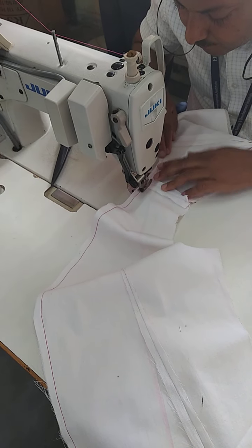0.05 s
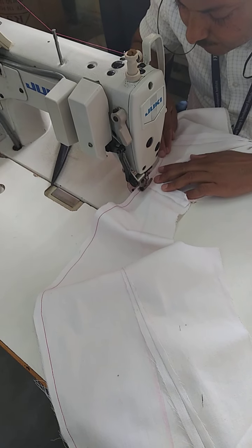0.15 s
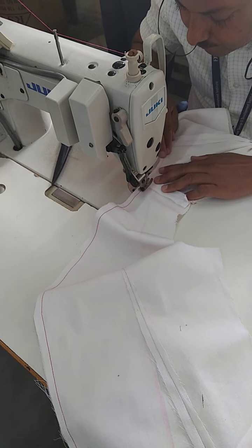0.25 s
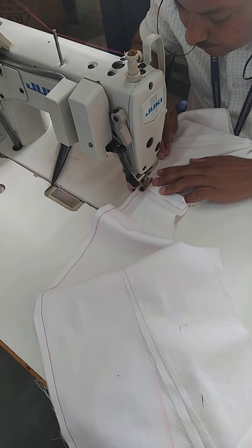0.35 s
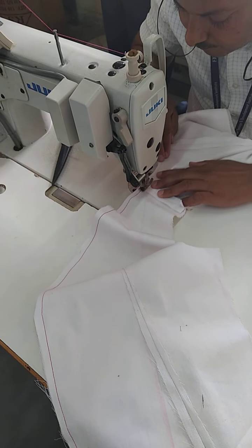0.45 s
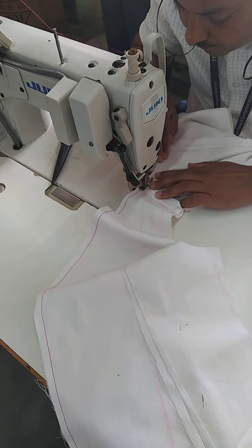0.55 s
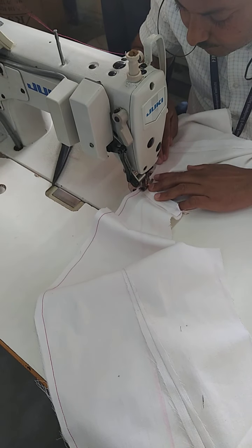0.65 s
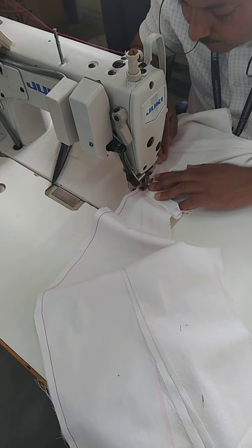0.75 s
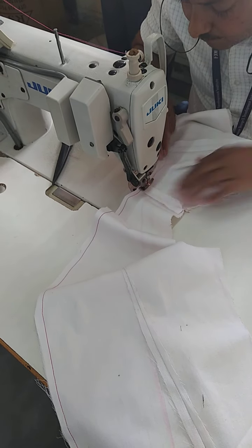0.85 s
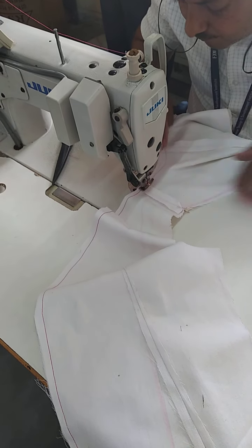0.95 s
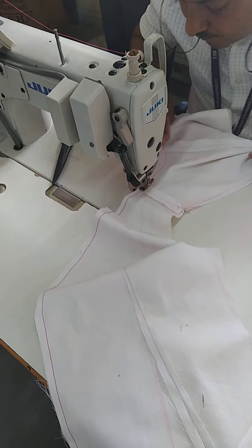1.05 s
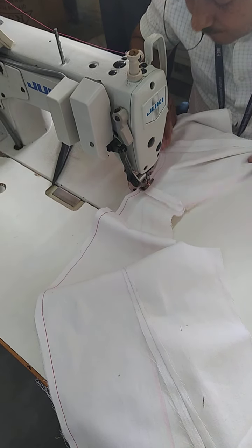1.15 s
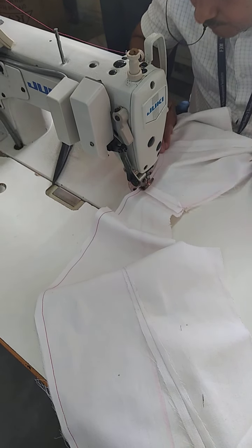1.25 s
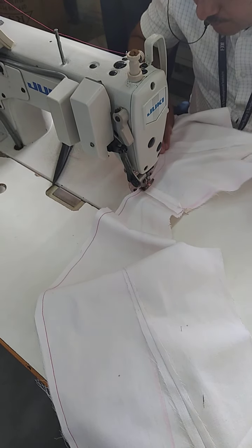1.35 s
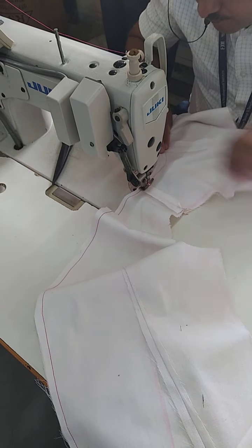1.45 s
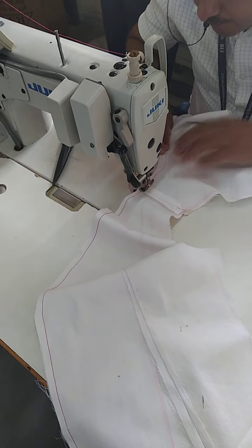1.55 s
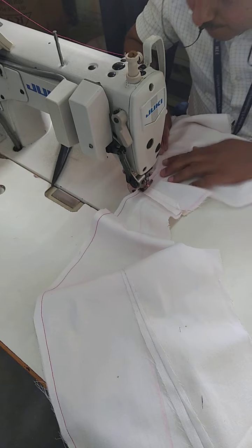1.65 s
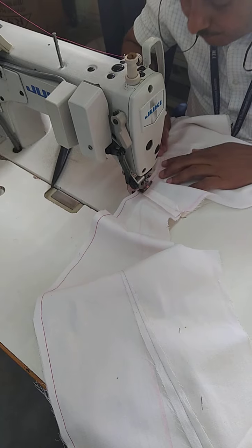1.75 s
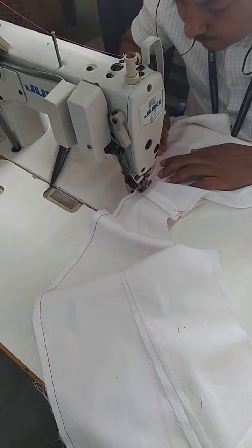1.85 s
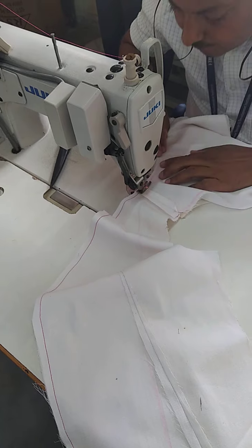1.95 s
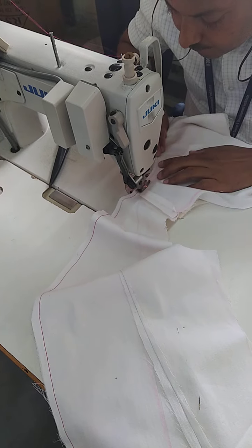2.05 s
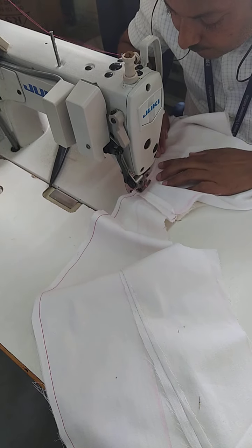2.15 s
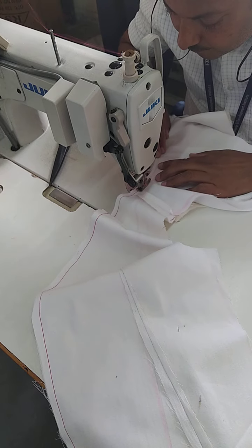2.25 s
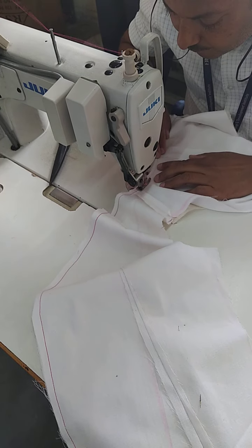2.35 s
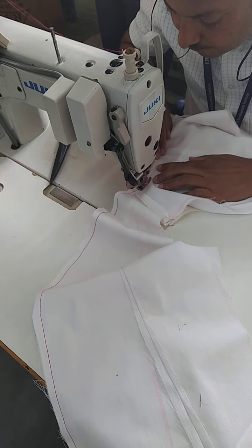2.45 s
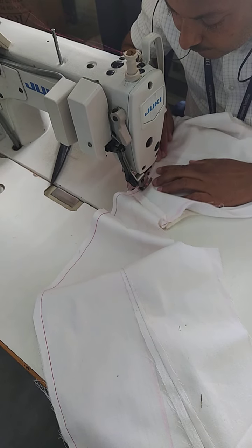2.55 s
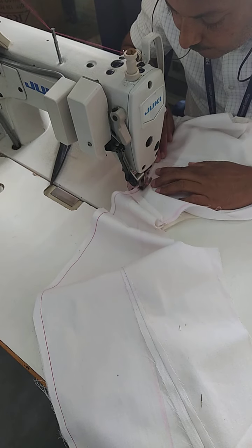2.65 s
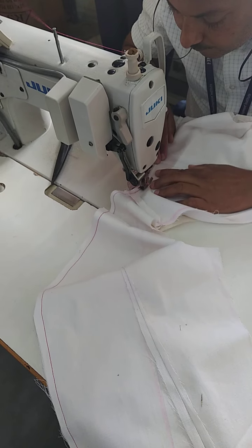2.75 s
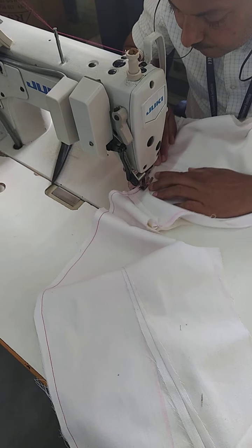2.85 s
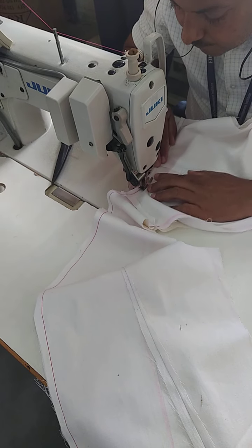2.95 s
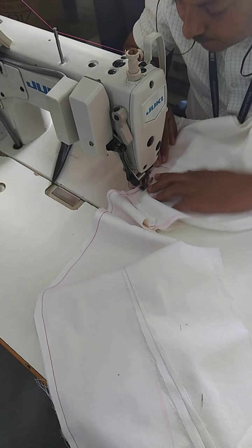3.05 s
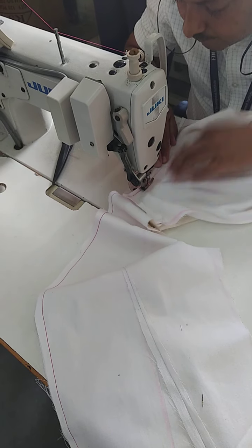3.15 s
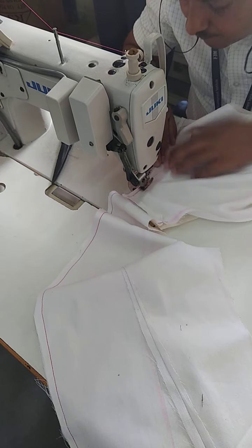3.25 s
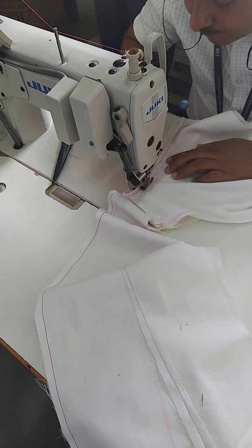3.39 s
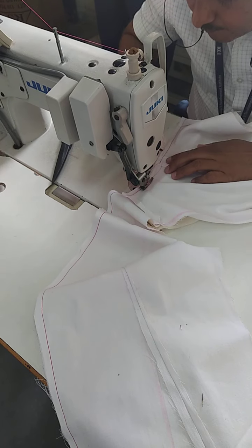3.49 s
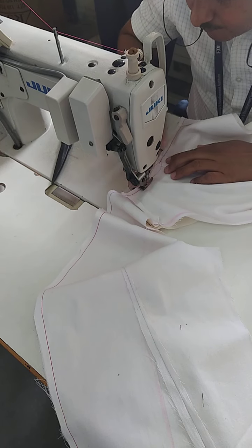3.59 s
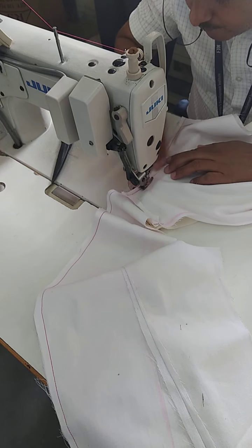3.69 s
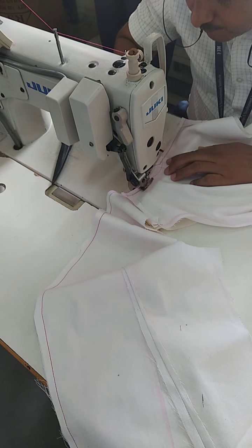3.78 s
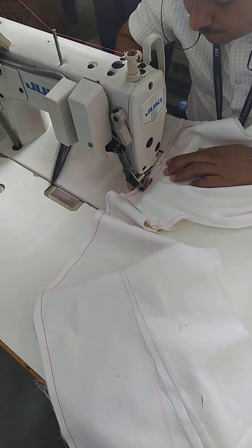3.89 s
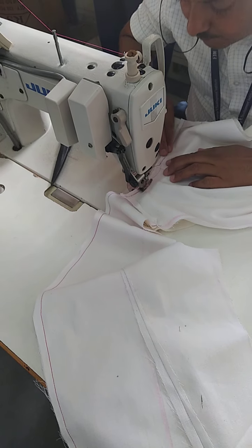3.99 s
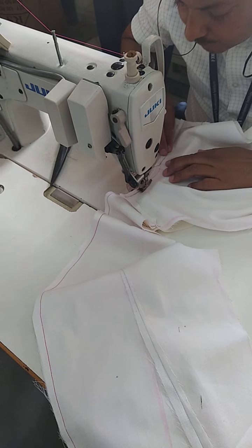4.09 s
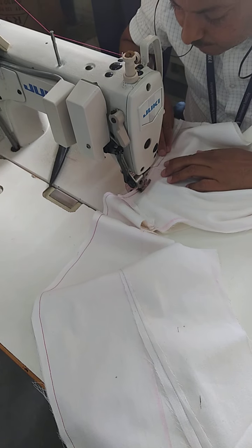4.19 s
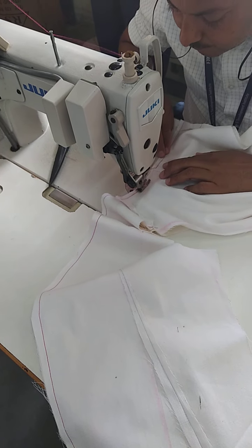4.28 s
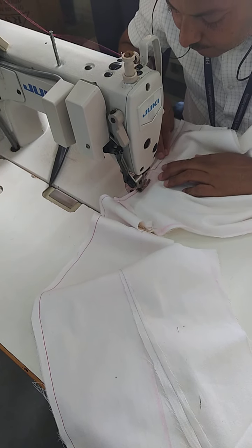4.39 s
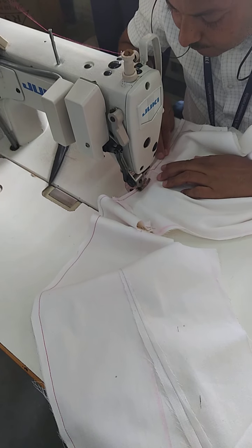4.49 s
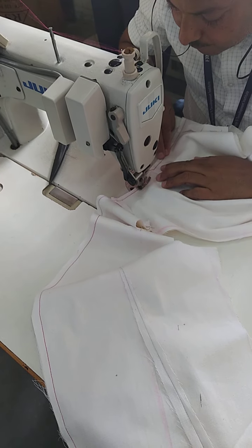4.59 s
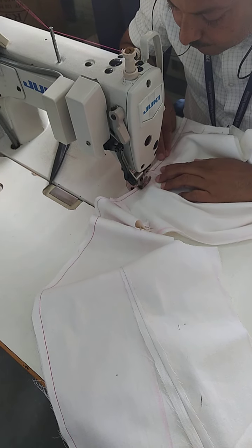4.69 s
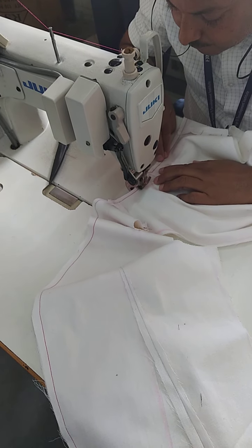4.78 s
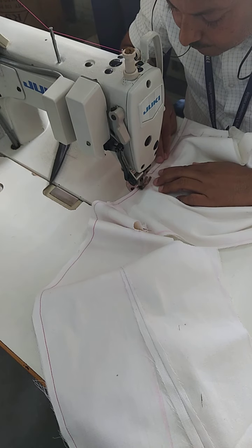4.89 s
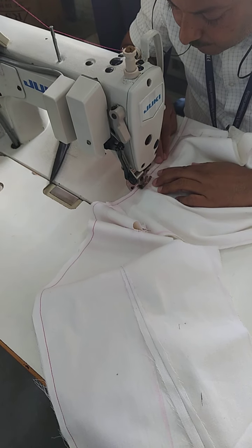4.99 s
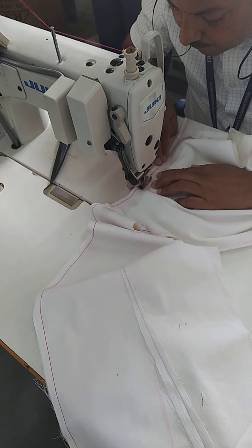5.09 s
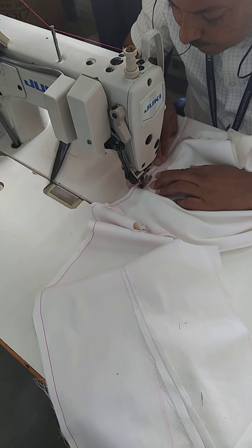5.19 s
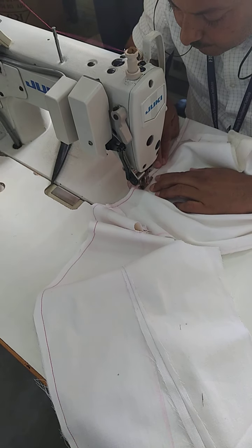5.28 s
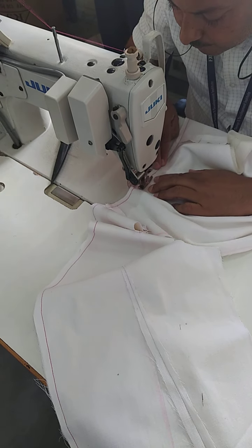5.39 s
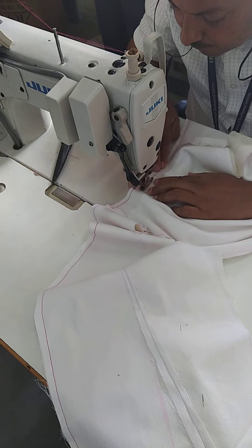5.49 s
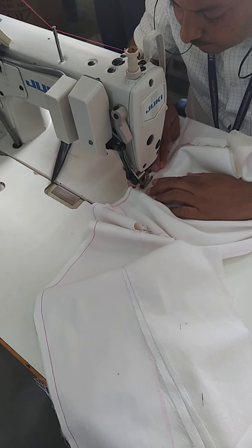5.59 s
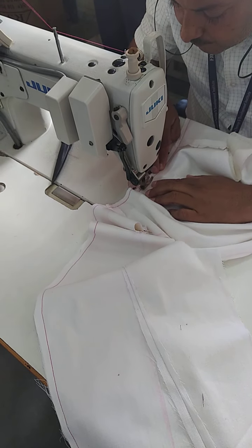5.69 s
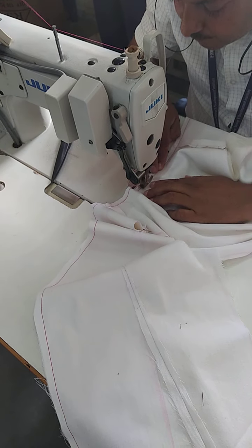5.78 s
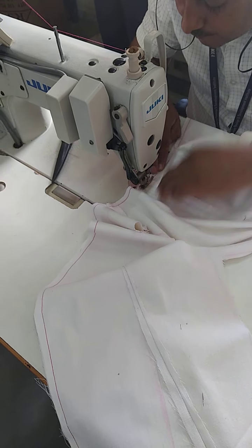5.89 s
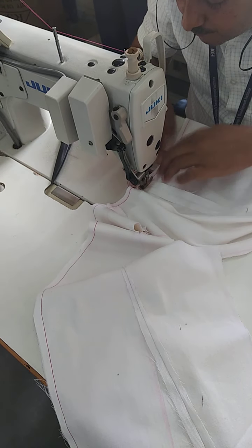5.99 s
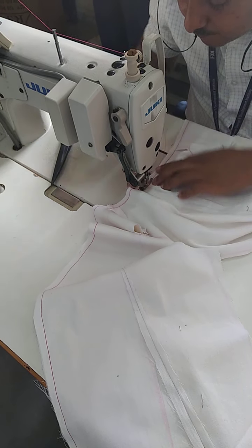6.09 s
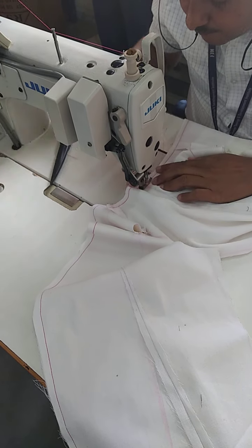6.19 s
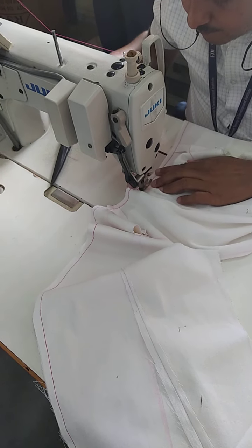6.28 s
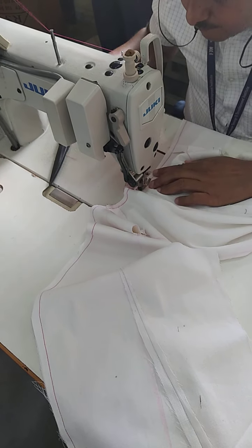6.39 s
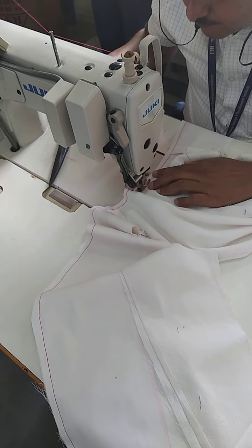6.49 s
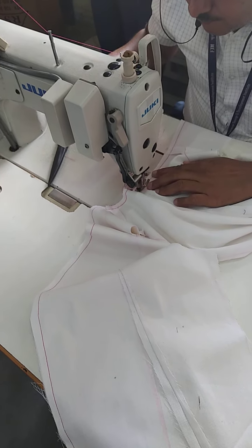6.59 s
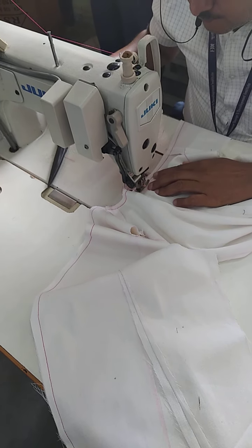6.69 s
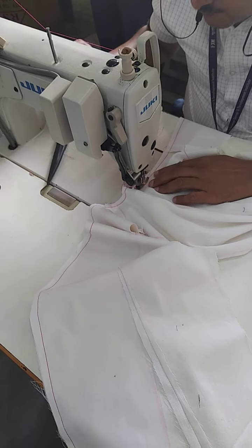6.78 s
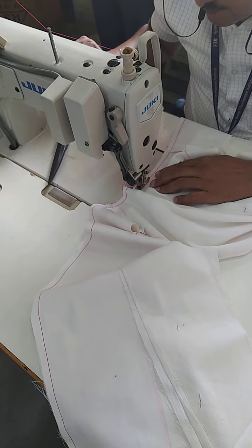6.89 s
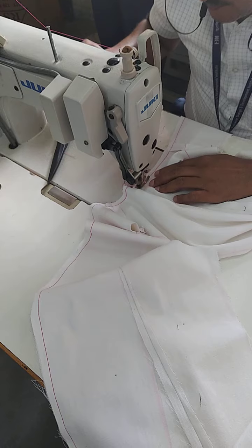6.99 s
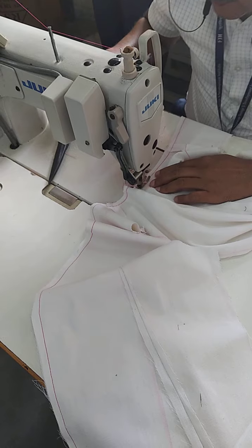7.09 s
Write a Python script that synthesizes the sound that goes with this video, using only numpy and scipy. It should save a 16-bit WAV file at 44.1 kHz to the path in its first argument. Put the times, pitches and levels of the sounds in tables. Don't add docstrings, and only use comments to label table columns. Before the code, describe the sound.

A close industrial sewing machine in a workshop, recorded in stereo with very low background: distant machines and fans as a dull, muffled floor. At 0.25 s a jolt and strong gear whir burst out, peaking near 0.33 and fading by 0.8, with a brake knock at 0.63. Quiet follows, with faint high cloth rustle near 1.1-1.4. At 1.95 a second, softer run starts, purring at about 17 turns per second with crisp needle ticks around 2.1-2.35, stopping with a knock at 2.96. Near silence until 4.16, when the longest run leaps in, bright and rattling, with sharp needle strikes to 4.45, then steady throbbing whir. Around 5.2-5.34 cloth scrapes and squeaks. It stops at 5.82 with a knock. A short strong burst runs 6.22-6.58, ending in a knock. Hard metallic trimmer clacks with brief whirs land at 6.88, 7.03 and 7.10.

```python
import sys
import numpy as np
from scipy import signal
from scipy.fft import rfft, irfft, next_fast_len
from scipy.io import wavfile
from scipy.ndimage import uniform_filter1d, map_coordinates

SR = 44100
rng = np.random.default_rng(int(sys.argv[2]) if len(sys.argv) > 2 else 0)


def ratio_of_db(decibels):
    return 10 ** (np.asarray(decibels, float) / 20)


def generate_wav(signal):
    frames = np.transpose(np.atleast_2d(signal))
    scaled = np.clip(frames, -1, 1) * 32767
    pcm = np.round(scaled).astype(np.int16)
    wavfile.write(sys.argv[1], SR, pcm)


N = 314874

# (time [s], level [dB])
LOAD_RUNS = [
    [(0.245, -76), (0.28, -32.5), (0.33, -25), (0.41, -31), (0.5, -36.5), (0.58, -46.5), (0.67, -53.5),
     (0.8, -60.5), (0.9, -76)],
    [(1.945, -91), (1.98, -38.5), (2.0, -34), (2.07, -41.5), (2.4, -45.5), (2.88, -47), (3.0, -58.5),
     (3.08, -60.5), (3.2, -75)],
    [(4.14, -68.5), (4.18, -33.5), (4.22, -28.5), (4.32, -34.5), (4.45, -39.5), (4.5, -46), (5.74, -46.5),
     (5.87, -58), (6.0, -69)],
    [(6.21, -64), (6.25, -32), (6.28, -29.5), (6.35, -29.5), (6.4, -38), (6.47, -44), (6.6, -51.5),
     (6.7, -57.5), (6.8, -68)],
    [(6.9, -24.5), (6.93, -33), (6.995, -35), (7.012, -49), (7.05, -37), (7.07, -45), (7.09, -54),
     (7.12, -26.5), (7.14, -34.5)],
]
# (start [s], opening speed [turns/s], later speed [turns/s], stop [s])
SHAFT_RUNS = [
    (.272, 23, 18, .64),
    (1.97, 15.2, 16.8, 2.96),
    (4.16, 20.5, 15.86, 5.82),
    (6.228, 21.2, 20, 6.58),
]
CRUISE_DB = -47


def unit(x):
    return x / np.sqrt(np.mean(x ** 2) + 1e-20)


def noise():
    return rng.standard_normal((2, N))


def gains(spans):
    rows = []
    for span in spans:
        rows += [(span[0][0] - .04, -110), *span, (span[-1][0] + .05, -110)]
    return np.interp(np.arange(N) / SR, *np.transpose(rows))


def swell(s, db, rise, fall, hold=0):
    t = np.arange(N) / SR - s
    return ratio_of_db(db + rise * np.minimum(t, 0) - fall * np.maximum(t - hold, 0))


def filtered(x, response):
    m = next_fast_len(N + 8192)
    return irfft(rfft(x, m) * response(np.fft.rfftfreq(m, 1 / SR)), m)[..., :N]


def shape(points):
    f, v = np.transpose(points)
    return lambda hz: ratio_of_db(np.interp(np.log(hz + 1), np.log(f), v))


def peak(hz, width):
    return lambda f: 1j * f * width / (hz * hz - f * f + 1j * f * width)


def peaks(rows):
    return lambda f: sum((-1) ** k * ratio_of_db(db) * peak(hz, w)(f) for k, (hz, w, db) in enumerate(rows))


def narrow(x, hz, width):
    return filtered(x, lambda f: peak(hz, width)(f) * peak(hz, 2 * width)(f))


def patchy(depth_db):
    z = signal.stft(noise(), nperseg=512)[2]
    field = uniform_filter1d(rng.standard_normal(z.shape[1:]), 6, 0)
    field = uniform_filter1d(field, 6, 1)
    return signal.istft(z * ratio_of_db(depth_db * unit(field)), nperseg=512)[1][:, :N]


def shaft():
    opening_turns = 4
    knots, made = [], 0
    for start, opening, later, stop in SHAFT_RUNS:
        settle = start + opening_turns / opening
        end = made + opening_turns + (stop - settle) * later
        knots += [(start, made), (settle, made + opening_turns), (stop, end)]
        made = np.ceil(end)
    return np.interp(np.arange(N) / SR, *np.transpose(knots))


def running():
    # (frequency [Hz], width [Hz], level [dB])
    arm_modes = [(1276, 13, 1), (1965, 73, 1.5), (2412, 72, 1.5), (2850, 70, 10), (3130, 37, 7),
                 (5300, 120, -2.5), (5700, 50, -28), (7550, 720, 1)]
    # (frequency [Hz], width [Hz], level [dB])
    table_modes = [(103, 94, -6), (195.7, 109, 2.5), (311.3, 65, 2), (619, 150, 3), (836, 80, -2)]
    # (frequency [Hz], level [dB])
    gear_tone = [(530, -18.5), (900, -1), (1150, -0.5), (1960, -4.5), (2880, -10), (3530, 4), (5310, -1.5),
                 (7560, -7), (8300, -33.5), (10800, -54.5), (18300, -120)]
    # (frequency [Hz], level [dB])
    thread_tone = [(4710, -43.5), (8000, 6.5), (8970, 1), (10500, 3.5), (12700, -4), (15100, -1),
                   (15900, -22)]

    load_db = gains(LOAD_RUNS) - CRUISE_DB

    def follow(db, grows, fades):
        return ratio_of_db(db + np.where(load_db > 0, grows, fades) * load_db)

    turns = shaft()
    part = turns % 1

    def throb(once_db, twice_db):
        return ratio_of_db(once_db * np.cos(2 * np.pi * part) + twice_db * np.cos(4 * np.pi * part))

    def head(f):
        deaf = 1 - .65 * np.abs(peak(3720, 350)(f))
        return shape(gear_tone)(f) * (.62 + np.abs(peaks(arm_modes)(f))) * deaf

    click = ratio_of_db(8 + 3 * rng.standard_normal(64))[turns.astype(int)] * np.exp(-part / 0.06)
    gears = filtered(patchy(depth_db=.9), head) * throb(0.5, 0.79) * (1 + 0.11 * click)
    table = filtered(patchy(depth_db=4.0), lambda f: peaks(table_modes)(f) * peak(350, 1200)(f))
    table = table * throb(0.27, 0.31)
    thread = filtered(noise() * (1 + click), shape(thread_tone))

    whir = ratio_of_db(-5.5) * ratio_of_db(CRUISE_DB + load_db) * unit(gears)
    rumble = ratio_of_db(-4.5) * follow(-54, grows=0.83, fades=.55) * unit(table)
    hiss = ratio_of_db(-1.5) * follow(-65, grows=1.166, fades=2.1) * unit(thread)
    return whir + rumble + hiss


def needle():
    # (time [s], peak level [dB], pitch [Hz], edge level [dB])
    strikes = [(0.229, -58, 6900, -5), (0.246, -43, 6200, -18), (0.6965, -42, 6530, -25),
               (0.727, -38, 5430, -24), (0.785, -51, 5500, -29), (1.9225, -53, 5150, -14),
               (1.9354, -51, 4930, -11.5), (2.1156, -26, 5800, -35), (2.2064, -30.5, 5300, -20),
               (2.2855, -17.5, 5470, -34), (2.2947, -23.5, 6600, -24), (2.3454, -33, 5170, -12),
               (3.0499, -49, 5750, 30.5), (4.2, -24, 5740, -18), (4.246, -9.5, 6100, -24.5),
               (4.2935, -7, 6400, -19.5), (4.3427, -10, 5400, -30.5), (4.3537, -22, 5270, -16),
               (4.4021, -11, 5890, -16), (4.4154, -24, 5880, -21), (4.5365, -18.5, 6380, -29),
               (4.6039, -22.5, 6100, -28), (4.667, -34, 6360, -23.5), (4.9802, -33, 5700, -22.5),
               (5.0417, -32, 5300, -30), (6.1876, -52.5, 4430, -30)]
    plate_db, sharp = -6, .75
    out = np.zeros((3, 2, N + 2048))
    t = np.arange(2048) / SR
    for s, db, hz, edge_db in strikes:
        ping = np.sin(2 * np.pi * hz * t) * np.exp(-((t - .0012) / .00028) ** 2)
        onset = 1 - np.exp(-(t / .0012) ** 2)
        rattle = rng.standard_normal((2, len(t))) * ratio_of_db(-60 * t / 0.02) * onset
        tip = sharp * ping + 1.47 * rattle
        plate = ratio_of_db(plate_db) * rattle
        edge = ratio_of_db(edge_db - 15.5) * rattle * ratio_of_db(-60 * t / 0.0083)
        strike = ratio_of_db(db + 1.0) * np.array([tip, plate, edge]) * [[1], [.7]]
        out[..., round(s * SR):][..., :len(t)] += strike
    tip, plate, edge = out[..., :N]
    tip_tone = shape([(3200, -10), (4000, 0), (8000, 0), (9000, -10), (16000, -18)])
    tip = filtered(narrow(tip, 5700, 5000), tip_tone)
    return tip + narrow(plate, 3000, 700) + narrow(edge, 11000, 2500)


def jolt():
    # (arm level [dB], bed level [dB], table level [dB], stand level [dB])
    pulls = [
        (-29.5, -33, -49, -34.5),
        (-72, -53, -73, -47),
        (-51, -50.5, -36.5, -37.5),
        (-40, -44, -47, -40.5),
    ]
    # (frequency [Hz], width [Hz])
    casting = [
        (812, 72),
        (334.7, 14),
        (204.5, 8.1),
        (103.2, 25),
    ]
    # (peak after start [s], rise [dB/s], fall [dB/s])
    swings = [
        (0.024, 1286, 118.5),
        (0.016, 898.5, 159.5),
        (0.087, 353, 99),
        (0.04, 594.5, 264),
    ]
    shake = noise()
    out = 0
    for (late, rise, fall), (hz, width), dbs in zip(swings, casting, zip(*pulls)):
        gain = sum(swell(run[0] + late, db, rise, fall) for run, db in zip(SHAFT_RUNS, dbs))
        out = out + gain * unit(narrow(shake, hz, width))
    return ratio_of_db(-5.5) * out


def knocks():
    # (time [s], peak level [dB], thud level [dB], clack level [dB], 60 dB
    # decay [s])
    blows = [(0.2645, -43, 19, -12, 0.088), (0.6325, -36, 6.5, -10.5, 0.13), (1.9574, -51, 19, -4, 0.041),
             (2.9589, -38, 3, -9, 0.078), (3.1163, -52.5, 7, -12, 0.11), (4.164, -35, 3, -11, 0.085),
             (5.821, -41, 9, -7, 0.16), (6.22, -44, 13, -18, 0.092), (6.557, -30, 6, -6, 0.13),
             (6.5664, -44, 8, -1, 0.079), (6.6607, -39.5, 12, -12, 0.096), (6.8773, -31.5, 7.5, 5.5, 0.037),
             (6.8833, -9, -6.5, -8, 0.051), (7.023, -29.5, 4.5, -9, 0.16),
             (7.0278, -16.5, -6.5, -7.5, 0.052), (7.0963, -46, -36, -2, 0.063),
             (7.1043, -12, -6.5, -4.5, 0.034)]
    # (frequency [Hz], level [dB])
    iron = [(110, 8), (175, -1.5), (280, -6), (583, -10.5), (690, -5), (1050, -5.5), (1340, -2),
            (1640, -20), (2110, -4.5), (2390, -3), (2850, -31.5), (3530, -16), (4800, 5.5), (5400, -20),
            (6300, 4), (7400, 8.5)]
    out = np.zeros((2, N + 4096))
    t = np.arange(4096) / SR
    hz = np.fft.rfftfreq(len(t), 1 / SR) + 1
    for s, db, thud_db, clack_db, t60 in blows:
        fade = ratio_of_db(-60 * t / t60) * (1 - np.exp(-t / .0015))
        tilt = shape([(100, thud_db - 20), (600, thud_db), (2500, 0), (3700, -3.5), (4900, clack_db + 4.5),
                      (7800, clack_db), (8600, clack_db - 7), (16000, clack_db - 24.5)])
        ring = 0
        for mode, level in iron:
            strength = ratio_of_db(level + rng.normal(0, 4.3, (2, 1)))
            ring = ring + strength * np.sin(2 * np.pi * mode * t + rng.uniform(0, 5.7))
        blow = fade * (0.28 * ring + 2.34 * rng.standard_normal((2, len(t))))
        blow = irfft(rfft(np.roll(blow, 64, axis=1)) * tilt(hz))
        out[:, round(s * SR) - 64:][:, :len(t)] += ratio_of_db(db - 7) * blow
    return out[:, :N]


def servo():
    wake_levels = [
        -66.5,
        -71,
        -73,
        -74.5,
    ]
    # (time [s], level [dB], length [s])
    brakings = [
        (0.775, -90, .01),
        (2.93, -84, .035),
        (5.746, -90, 0.31),
    ]
    waking = unit(narrow(noise(), 10850, 79))
    braking = np.sqrt(2) * np.sin(2 * np.pi * 14992 * np.arange(N) / SR)
    wake = sum(swell(run[0] - .045, db, rise=1400, fall=500) for run, db in zip(SHAFT_RUNS, wake_levels))
    brake = sum(swell(s, db, rise=600, fall=450, hold=length) for s, db, length in brakings)
    return wake * waking + brake * braking


def chatter():
    lag_s = 0.031
    load_db = np.roll(gains(LOAD_RUNS[:4]) - CRUISE_DB, round(lag_s * SR))
    gain = ratio_of_db(-63 + 1.3 * load_db)
    return gain * unit(narrow(patchy(depth_db=2.5), 5700, 1500))


def cloth():
    # (time [s], level [dB])
    drag = [
        (5.19, -53),
        (5.212, -39.5),
        (5.228, -32.5),
        (5.25, -31.5),
        (5.28, -30.5),
        (5.3, -38),
        (5.312, -40),
        (5.34, -43),
    ]
    # (frequency [Hz], width [Hz])
    weave = [
        (1733, 30),
        (3200, 710),
        (3840, 660),
        (4200, 960),
        (5900, 890),
        (1920, 1400),
    ]
    scrape = ratio_of_db(gains([drag]))
    squeak = swell(5.225, -34.5, rise=1500, fall=1500, hold=0.04)
    catch = ratio_of_db(2.0 * map_coordinates(rng.standard_normal(2000), [np.arange(N) * 220 / SR]))
    rub = filtered(noise() * catch, shape([(5000, -7), (6200, -5.5), (8200, -20.5)]))
    bands = [unit(narrow(rub, hz, w)) for hz, w in weave]
    scraping = sum(share * band for share, band in zip([0.48, 0.37, 0.36, 0.08, 0.37], bands[1:]))
    return squeak * bands[0] + scrape * scraping


def rustle():
    # (time [s], level [dB], length [s])
    shifts = [
        (0.144, -78.5, 0.026),
        (1.096, -78, .05),
        (1.255, -83, .16),
        (3.037, -77, 0.05),
        (3.7, -89, .04),
    ]
    brush_tone = shape([(3000, -6), (6000, 7.5), (12000, -9), (13500, -26.5)])
    brush = unit(filtered(patchy(depth_db=5), brush_tone))
    return brush * sum(swell(s, db, rise=350, fall=350, hold=length) for s, db, length in shifts)


def shop():
    # (frequency [Hz], level [dB])
    floor_tone = [(24, -79.5), (40, -37), (146, -4), (234, -9.5), (268, -3), (307, -10), (395, -10),
                  (442, -12.5), (892, -10.5), (1050, -10), (2360, -19), (2650, -21.5), (7680, -32.5),
                  (9000, -34.5), (11700, -71.5), (19800, -120)]
    upper = shape([(2800, 0), (4500, 3), (7700, 0), (8100, -14)])
    blur = filtered(patchy(depth_db=1.2), lambda f: shape(floor_tone)(f) * upper(f))
    return ratio_of_db(-63 - 1.44) * unit(blur)


def scene():
    machine = running() + needle() + jolt() + knocks() + servo() + chatter()
    return machine + cloth() + rustle() + shop()


def band_limit(x):
    return signal.sosfilt(signal.butter(12, 16460, fs=SR, output="sos"), x)


def record(dry):
    # (frequency [Hz], likeness [0-1], left lead [rad], left over right [dB])
    mic_pair = [(150, .98, .15, -1), (350, .9, .7, 2), (600, .85, -.4, 3), (850, .5, -1.2, 5.5),
                (1050, .95, -2.6, 1), (1400, .85, -2.4, .5), (1800, .6, -1.5, -4), (2130, .5, -.2, 6),
                (2450, .97, 0, -.5), (2750, .9, 0, -1), (3100, .55, -.5, -7), (3700, .5, -1.7, -3),
                (5300, .3, -4.6, -7.5), (7500, .3, -9.6, -1.5), (10500, .35, -16.4, 6),
                (16000, .35, -29, 2)]
    f, alike, lead, balance_db = np.transpose(mic_pair)

    def blend(hz):
        turn = np.arccos(np.clip(np.interp(hz, f, alike), 0, 1)) / 2
        return np.array([np.cos(turn), np.sin(turn)])

    def sides(hz):
        half = ratio_of_db(np.interp(hz, f, balance_db) / 2) * np.exp(.5j * np.interp(hz, f, lead))
        low_cut = hz ** 4 / (hz ** 4 + 48.0 ** 4)
        return np.array([half, 1 / half]) * low_cut

    like, unlike = filtered(dry, blend)
    pair = filtered(np.array([like + unlike, like - unlike]), sides)
    return band_limit(ratio_of_db(4) * pair)


dry = scene()
out = record(dry)
generate_wav(out)
```